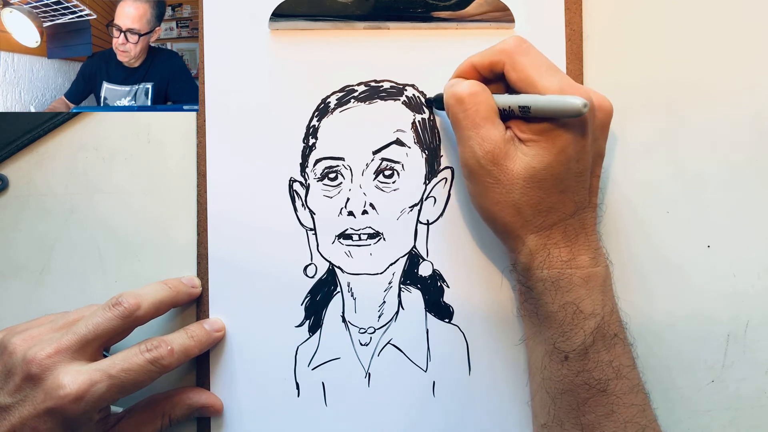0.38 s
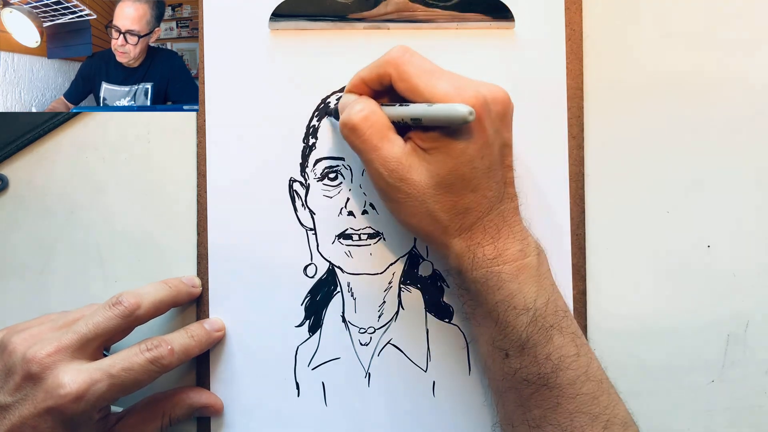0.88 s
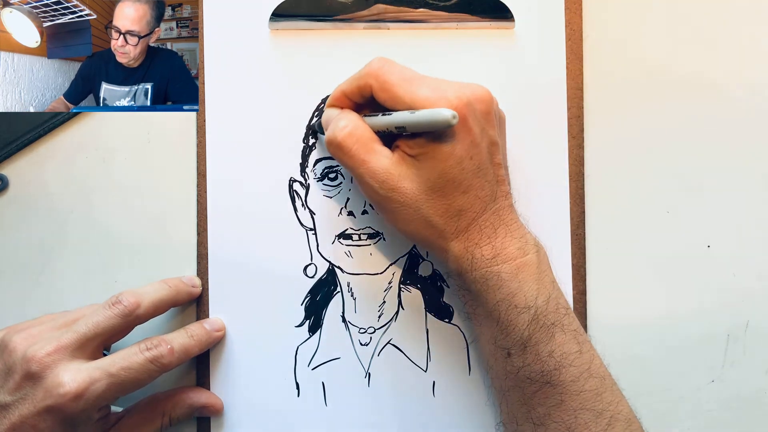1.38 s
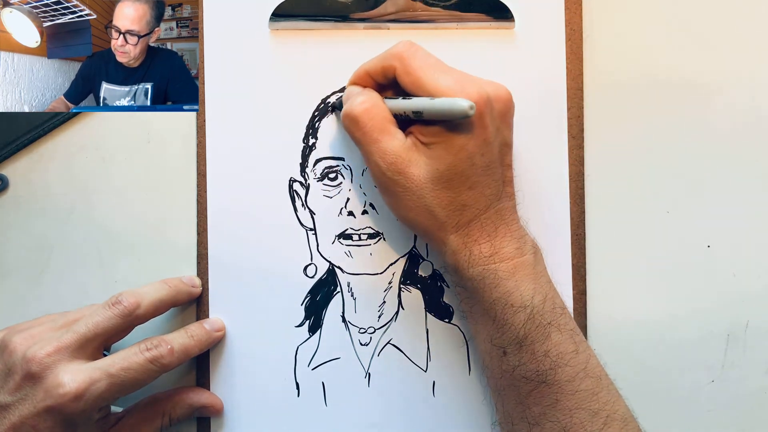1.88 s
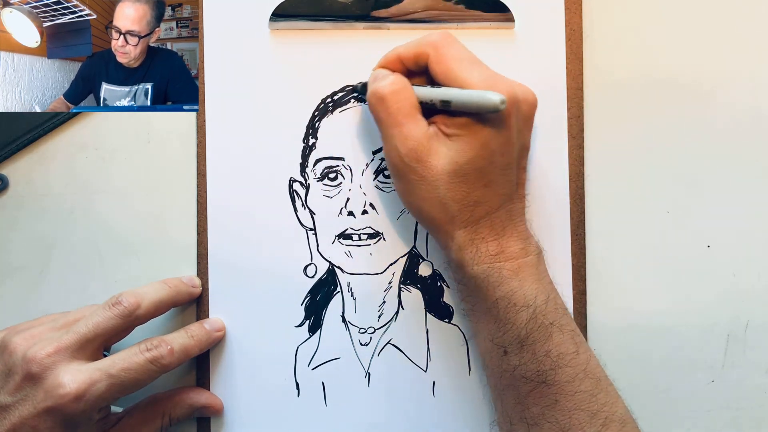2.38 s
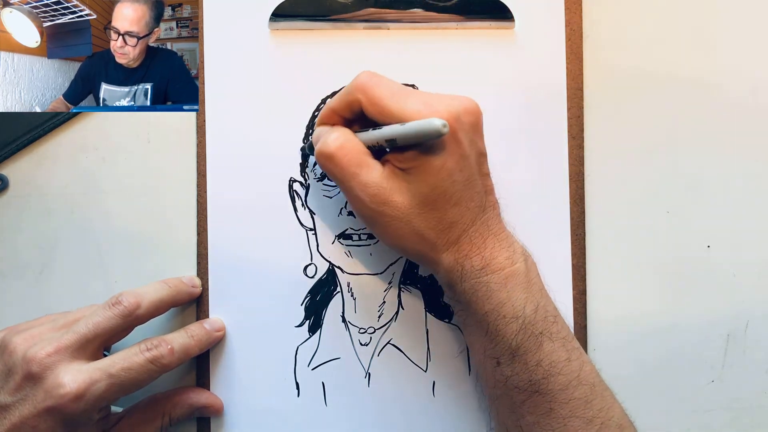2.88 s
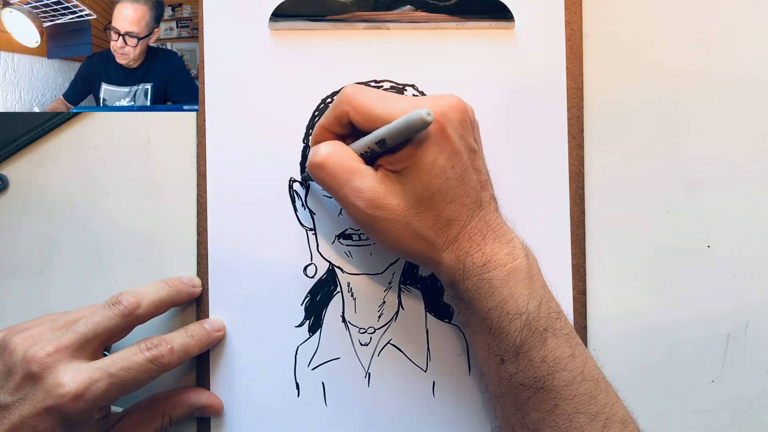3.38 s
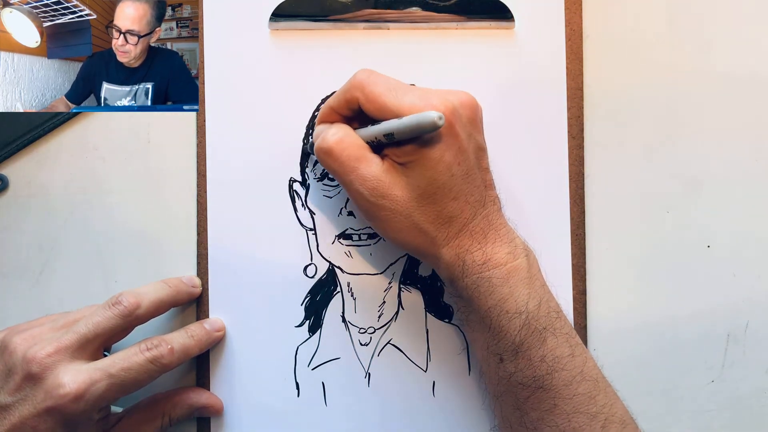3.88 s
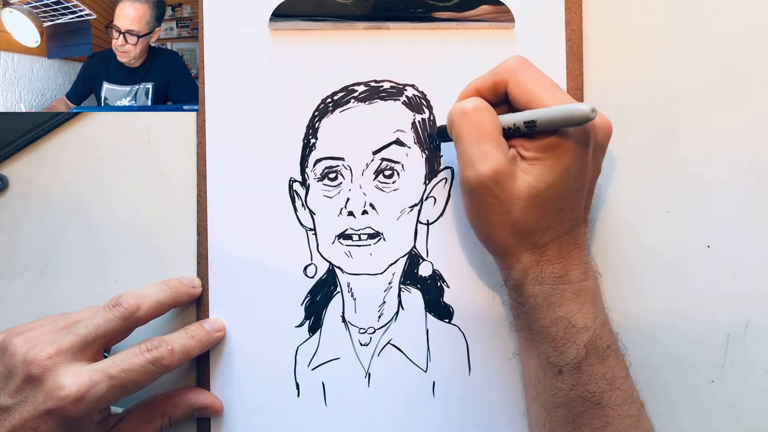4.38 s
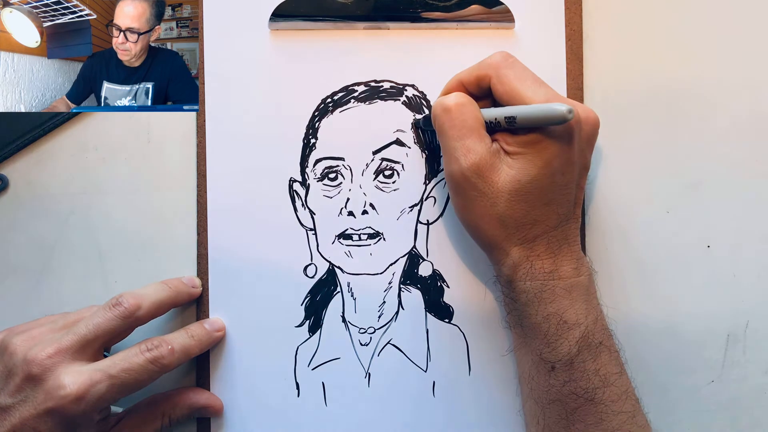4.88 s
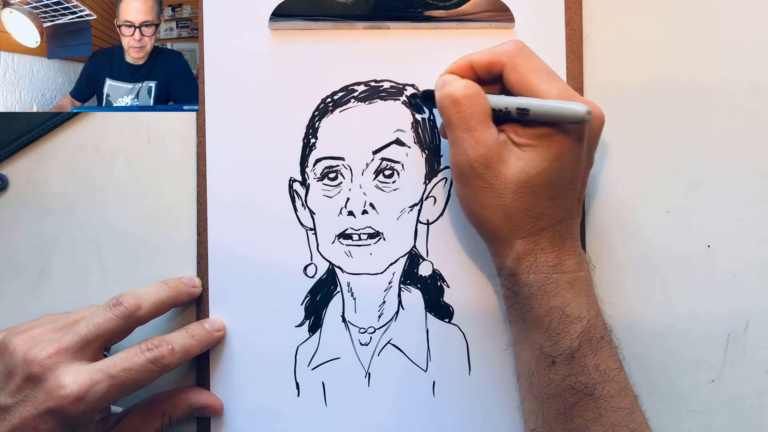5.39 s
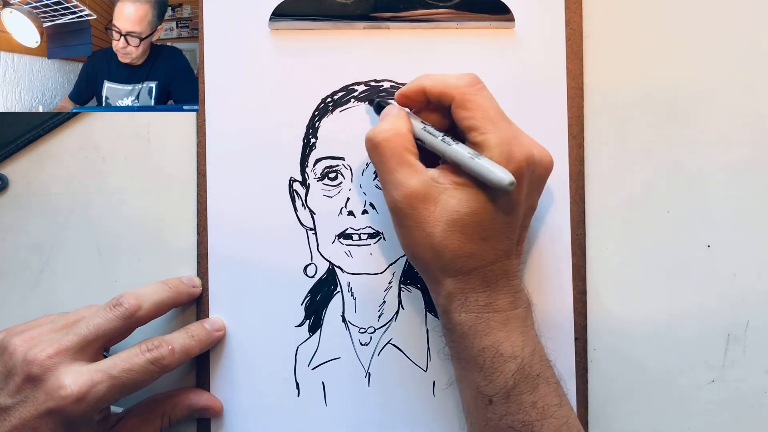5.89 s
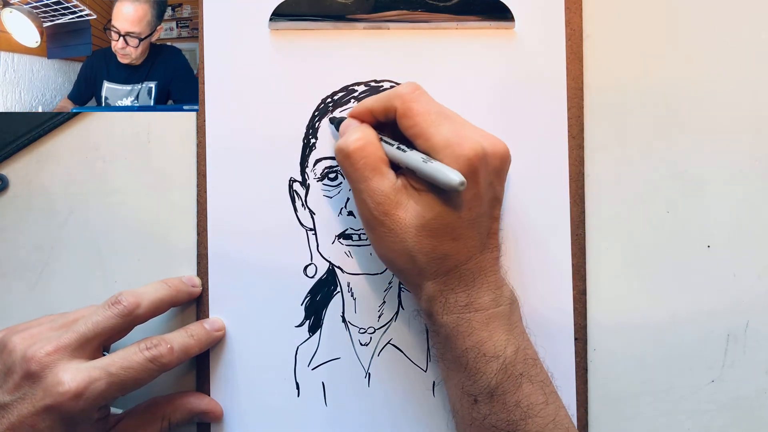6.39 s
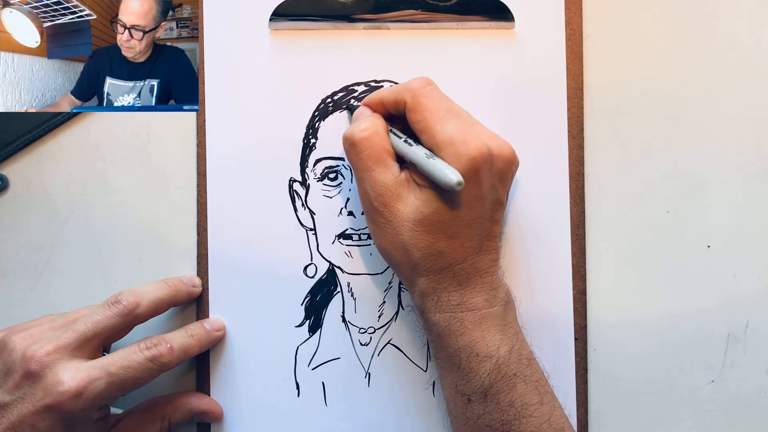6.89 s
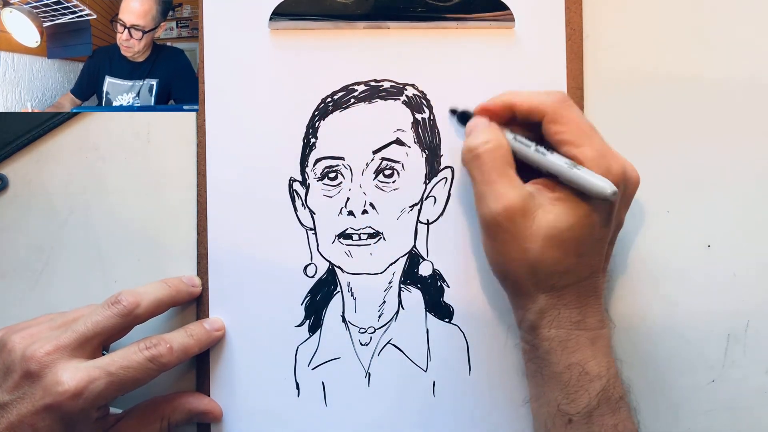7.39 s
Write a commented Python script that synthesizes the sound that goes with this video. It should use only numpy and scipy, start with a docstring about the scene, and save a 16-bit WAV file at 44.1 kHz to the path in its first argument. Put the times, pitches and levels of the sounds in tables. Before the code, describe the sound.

A small, quiet, dry room with dull traffic rumble outside. A marker hatches in fast bursts, thin and hissy with a woody rasp from the board beneath, broken by small taps. A deep engine throb pulses and grows, then sinks after five seconds. A palm thumps down, soft knocks follow in the pause, and a few brisk strokes and hand brushes finish. The microphone is close to the desk.

```python
"""A felt-tip marker hatches paper on a wooden board in a small quiet room, over traffic that swells and sinks:
shaped noise. From the start the tip catches on paper fibres, ringing pen barrel and board; the hand slides, and
there are ticks and squeaks (noise puffs) and knocks (fading tones of the board). After 1 s an engine comes in,
a rising tone with overtones and rough noise, its boom strongest around 4 to 5 s; late in that stretch the tip
judders. The pen pauses from about 5 s, with a palm thump and soft knocks; a few strokes follow, one at the end."""
import sys
import numpy as np
from scipy import signal
from scipy.fft import rfft, irfft, next_fast_len
from scipy.io import wavfile
from scipy.ndimage import uniform_filter1d

SR = 44100
rng = np.random.default_rng(int(sys.argv[2]) if len(sys.argv) > 2 else 0)


def linear_from_db(decibels):
    """Turn decibels (scalar or array-like) into linear amplitude factors; 0 gives 1."""
    return 10 ** (np.asarray(decibels, float) / 20)


def generate_wav(signal):
    """Clip the signal to [-1, 1] and save it as 16-bit WAV at the path in sys.argv[1]."""
    frames = np.transpose(np.atleast_2d(signal))
    scaled = np.clip(frames, -1, 1) * 32767
    pcm = np.round(scaled).astype(np.int16)
    wavfile.write(sys.argv[1], SR, pcm)


N = 330739


def rms_one(x):
    """Scale to rms 1."""
    return x / np.sqrt(np.mean(x ** 2) + 1e-20)


def in_time(rows):
    """Join each column after the first (time) by straight lines, one value a sample."""
    s, *columns = np.transpose(rows)
    return np.array([np.interp(np.arange(N) / SR, s, column) for column in columns])


def drift(rate_hz):
    """Slow random wandering of spread 1: noise sent twice through a one-pole low-pass."""
    r = np.exp(-80 * np.pi * rate_hz / SR)   # made at one value per 40 samples
    noise = rng.standard_normal(N // 40 + 2002)
    slow = signal.lfilter([1], [1, -2 * r, r * r], noise)[2000:]
    return np.interp(np.arange(N) / 40, np.arange(len(slow)), rms_one(slow))


def resonance(x, hz, width_hz):
    """Two-pole band-pass with gain 1 on top."""
    r = np.exp(-np.pi * width_hz / SR)
    feed = np.array([1, 0, -1]) * (1 - r * r) / 2
    return signal.lfilter(feed, [1, -2 * r * np.cos(2 * np.pi * hz / SR), r * r], x)


def coloured(spectrum, patchy_db):
    """Noise shaped by a spectrum, its level wandering; rms 1."""
    hz, db = np.transpose(spectrum)
    grid_hz = np.fft.rfftfreq(N, 1 / SR) + 1
    shape = linear_from_db(np.interp(np.log(grid_hz), np.log(hz), db, -80, -80))
    noise = irfft(rfft(rng.standard_normal(N)) * shape, N)
    return rms_one(noise * linear_from_db(patchy_db * drift(4.0)))


# traffic level over time: time_s, level_db, heavy_db (low end above that level)
TRAFFIC_LEVELS = [(0.0, -56, 7.5), (2.38, -60.5, 4), (2.86, -58.5, 6), (4.22, -58, 9.5), (4.68, -53, 3),
                  (5.12, -52.5, 8), (5.64, -55.5, -4), (6.2, -55.5, -0.5), (6.52, -48.5, 2.5),
                  (7.5, -51, -3.5)]
# noise colours, from deepest to highest: pitch_hz, relative_level_db (per Hz)
SUB_COLOUR = [(22, -28), (35, -1), (48, -12.5), (62, 5), (70, -14.5)]
LOW_COLOUR = [(36, -40), (62, 13.5), (150, 6), (200, -73), (330, -120)]
MID_COLOUR = [(88, -32), (150, 1.5), (216, -1), (393, -3), (547, -15), (600, -15.5), (780, -38),
              (1320, -120)]
AIR_COLOUR = [(350, -63), (600, -13), (726, -3.5), (855, 0.5), (1290, 2), (1580, -1.5), (2070, -2.5),
              (3380, -10), (10000, -24), (13200, -31), (15500, -37)]
SUB_DB, AIR_DB = -3.5, -58   # sub against the low end; air while traffic is at its mean dB
AIR_FOLLOWS, TREBLE_FOLLOWS = 0.69, -0.53   # dB per dB of traffic: the air swells and dulls


def rumble():
    """Traffic through the walls is deep noise; the air of the room is a fainter, higher one."""
    traffic_db, heavy_db = in_time(TRAFFIC_LEVELS)
    swing_db = traffic_db - traffic_db.mean()
    sub = linear_from_db(traffic_db + heavy_db + SUB_DB) * coloured(SUB_COLOUR, patchy_db=4.5)
    low = linear_from_db(traffic_db + heavy_db) * coloured(LOW_COLOUR, patchy_db=0.5)
    mid = linear_from_db(traffic_db) * coloured(MID_COLOUR, patchy_db=1.65)
    air = coloured(AIR_COLOUR, patchy_db=0.82)
    dull = signal.sosfiltfilt(signal.butter(2, 4000, fs=SR, output="sos"), air)
    treble = linear_from_db(TREBLE_FOLLOWS * swing_db) * (air - dull)
    return sub + low + mid + linear_from_db(AIR_DB + AIR_FOLLOWS * swing_db) * (dull + treble)


# engine over time, its boom swelling and sinking: time_s, firing_pitch_hz, boom_db (rms)
ENGINE_RUN = [(1.3, 43.6, -50), (1.75, 46.2, -45.5), (1.95, 47.2, -59), (2.47, 47.17, -72),
              (2.8, 49.23, -33.5), (3.01, 47.83, -47), (3.3, 52.2, -29.5), (3.51, 51.4, -46.5),
              (3.77, 52.4, -21), (4.01, 52.54, -30), (4.13, 54.8, -29.5), (4.23, 54, -21.5),
              (4.53, 53.87, -19), (4.93, 54.23, -18.5), (5.0, 55.37, -20.5), (5.11, 55.54, -32),
              (5.32, 56.36, -25), (5.6, 55.2, -50.5), (5.88, 55.9, -43.5), (6.1, 55.1, -41.5),
              (6.2, 57.52, -51), (6.39, 57.1, -44.5), (7.0, 59.96, -44.5), (7.17, 59.9, -58),
              (7.5, 58.2, -39)]
# overtones, rms with the boom at -30 dB: multiple, first_db, last_db, share (of the boom's swing)
ENGINE_OVERTONES = [(2, -47.5, -52.5, 0.49), (3, -60.5, -62, 0.24), (4, -84, -46.5, 0.36),
                    (5, -67.5, -66, 0.35), (6, -67, -88, .2), (7, -81, -73.5, 0.11)]
GRUFF_HZ, GRUFF_WIDTH_HZ = 149, 74.5   # exhaust noise; a second filter is twice as wide
GRUFF_GAIN_DB, GRUFF_FOLLOWS = -56, 0.53   # before the final sqrt(2), boom at -29.5 dB; dB per dB of boom
ROOM_MODE_HZ, ROOM_MODE_HALF_WIDTH_HZ, ROOM_MODE_DB = 166.8, 4.3, 8   # lifts overtones that pass through


def engine():
    """The firing tone booms; its overtones waver above it, with exhaust noise that swells with the boom."""
    hz, boom_db = uniform_filter1d(in_time(ENGINE_RUN), 1500, axis=1)
    phase = 2 * np.pi * np.cumsum(hz) / SR
    way = np.arange(N) / N   # 0 at the start, 1 at the end
    out = linear_from_db(boom_db) * np.sin(phase)
    for k, first_db, last_db, share in ENGINE_OVERTONES:
        level_db = first_db + way * (last_db - first_db) + 3.3 * drift(2.1) + share * (boom_db + 30)
        level_db += ROOM_MODE_DB / (1 + ((k * hz - ROOM_MODE_HZ) / ROOM_MODE_HALF_WIDTH_HZ) ** 2)
        out += linear_from_db(level_db) * np.sin(k * phase + 0.91 * drift(5.2))
    gruff = resonance(rng.standard_normal(N), GRUFF_HZ, GRUFF_WIDTH_HZ)
    gruff = resonance(gruff, GRUFF_HZ, 2 * GRUFF_WIDTH_HZ)
    gruff = rms_one(gruff * linear_from_db(3 * drift(6)))
    out += linear_from_db(GRUFF_GAIN_DB + GRUFF_FOLLOWS * (boom_db + 29.5)) * gruff
    fade_in = np.clip((way * N / SR - ENGINE_RUN[0][0] + 0.25) / 0.8, 0, 1)
    return np.sqrt(2) * out * fade_in   # a sine of peak sqrt(2) has rms 1


ROOM_T60_S, WALL_CUT_HZ, ROOM_DB = 0.16, 3300, -15.5   # fade of the lows by 60 dB; dulling; echo gain


def room(x):
    """Walls send sound round and round: eight feedback delays, duller on every round."""
    size = next_fast_len(N + SR // 2)
    z = np.exp(-2j * np.pi * np.arange(size // 2 + 1) / size)   # delay of one sample
    dull = np.exp(-2 * np.pi * WALL_CUT_HZ / SR)
    tail = 0
    for k, lag in enumerate((rng.uniform(.009, .03, 8) * SR).astype(int)):
        loop = linear_from_db(-60 * lag / SR / ROOM_T60_S) * (1 - dull) / (1 - dull * z) * z ** lag
        tail = tail + (-1) ** k * loop / (1 - loop)
    return irfft(rfft(x, size) * tail, size)[:N]


# ticks, squeaks and brushes, a low palm thump at 4.98 s, soft knocks near 5.8 s:
# start_s, peak_db, pitch_hz, t60_s (noise fades 60 dB), width_share (first filter's width / pitch)
NOISE_PUFFS = [(0.053, -32.5, 7100, 0.017, 0.057), (.324, -46, 3660, 0.014, 0.87),
               (.822, -52, 3630, 0.14, .05), (1.745, -47.5, 3860, .2, 0.031),
               (2.245, -42, 4230, 0.045, 0.056), (2.264, -52.5, 5820, 0.15, 0.067),
               (4.2, -51, 780, 0.15, 0.065), (4.233, -33.5, 3040, 0.0209, 0.17),
               (4.982, -24, 165.2, 0.19, 0.17), (5.771, -42, 442.5, 0.35, 0.22),
               (5.81, -42.5, 1000, 0.35, 0.29), (7.06, -51, 3791, .2, 0.052), (7.105, -49, 3416, .1, .08)]


def puffs():
    """Ticks, squeaks, brushes, the palm thump and soft knocks are short puffs of noise around one pitch."""
    out, t = np.zeros(N), np.arange(SR // 4) / SR
    for s, peak_db, hz, t60, share in NOISE_PUFFS:
        puff = rng.standard_normal(len(t)) * linear_from_db(-60 * t / t60) * np.minimum(t / t60 * 12, 1)
        puff = resonance(resonance(puff, hz, share * hz), hz, 2 * share * hz)
        out[round(s * SR):][:len(t)] += linear_from_db(peak_db) * puff / np.abs(puff).max()
    return out


# knocks on the board: start_s, level_db (rms of the first 30 ms), contact_cut_hz,
# thud_db (boost under 260 Hz), body_db (boost from there to 600 Hz)
KNOCKS = [(0.895, -49.5, 1610, 6, 5.5), (1.227, -37, 2500, 6.5, 7.5), (1.691, -30.5, 3500, -0.5, -0.5),
          (1.942, -35, 2760, 3, 1), (2.493, -34.5, 1900, -2, 2.5), (4.981, -30.5, 456, -2, -7),
          (7.22, -36.5, 547, -9.5, 1)]
# tones of the struck board: pitch_hz, relative_level_db, t60_s (time to fade 60 dB)
KNOCK_TONES = [(45, -11, 0.81), (92.2, -11.5, 0.24), (127.3, -2, 0.31), (162, -4.5, 0.072),
               (229, -3.5, 0.095), (295.5, -2.5, 0.043), (376, -0.5, 0.084), (478, -2.5, 0.051),
               (552, 3.5, 0.014), (654, 5.5, 0.016), (893, 8, 0.013), (1080, 2.5, 0.022), (1200, -1, 0.047),
               (1400, 3, 0.014), (1840, -14, 0.045), (1900, -14, 0.056), (2100, -5.5, 0.019),
               (2700, -3.5, 0.02), (3500, -8, 0.017), (4000, -15, 0.017)]


def knocks():
    """Each knock strikes all board tones through a soft or hard contact that chatters for a few ms."""
    out, t = np.zeros(N), np.arange(SR // 3) / SR
    chance = rng.normal(0, 1, (len(KNOCKS), len(KNOCK_TONES)))
    chatter = rng.normal(0, 1, (len(KNOCKS), 12))
    for (s, knock_db, cut_hz, thud_db, body_db), luck, bounces in zip(KNOCKS, chance, chatter):
        ring = 0
        for k, (hz, db, t60) in enumerate(KNOCK_TONES):
            boost_db = thud_db if hz < 260 else body_db * (hz < 600)
            level_db = db + 1.5 * luck[k] + boost_db - 60 * t / t60
            onset = 1 - np.exp(-t * hz * 2.0)
            ring = ring + (-1) ** k * linear_from_db(level_db) * onset * np.sin(2 * np.pi * hz * t)
        contact = np.zeros(600)
        contact[np.arange(12) * 47] = .5 * bounces * linear_from_db(-1.0 * np.arange(12))
        contact[0] = 1
        crisp = signal.sosfilt(signal.butter(2, 260, "high", fs=SR, output="sos"), ring)
        ring = ring - crisp + np.convolve(crisp, contact)[:len(t)]   # only the upper tones follow the chatter
        ring = signal.sosfilt(signal.butter(3, cut_hz, fs=SR, output="sos"), ring)
        ring *= 1 - np.exp(-t * cut_hz * 0.79)   # a soft contact builds up slowly
        at = round(s * SR)
        out[at:at + len(t)] += (linear_from_db(knock_db) * ring / ring[:1300].std())[:N - at]
    return out


# the tip grips and lets go: start_s (first slip), end_s, slips_per_s, depth_db
JUDDERS = [(4.54, 4.627, 39, 2.5), (4.718, 4.788, 52, 7.5)]


def judder():
    """Each slip starts loud and sinks until the next."""
    t, db = np.arange(N) / SR, np.zeros(N)
    for start, end, per_s, depth_db in JUDDERS:
        since_slip = (t - start) * per_s % 1   # 0 to 1
        db += depth_db * (.5 - since_slip) * (t > start) * (t < end)
    return linear_from_db(db)


RUN_UP_DB, SAG_DB_PER_S = 14.5, 77   # gain from landing to full speed; sag while held
LIFT_DB, LIFT_CURVE = 6, 0.82   # drop after one lift time; power of time in the lift
USUAL_STROKE_S, LIFT_FOLLOWS = 0.053, 0.37   # short strokes lift faster, as this power of their length


def stroke_db(t, peak, run_up, hold, lift_s):
    """A stroke speeds up from its landing, sags while held and lifts; 0 dB at full speed."""
    lift_s = lift_s * ((run_up + hold) / USUAL_STROKE_S) ** LIFT_FOLLOWS
    before = np.where(t > peak - run_up, -RUN_UP_DB * ((t - peak) / run_up) ** 2, -140)
    sag_db = SAG_DB_PER_S * np.minimum(t - peak, hold)
    fall_db = LIFT_DB * (np.maximum(t - peak - hold, 0) / lift_s) ** LIFT_CURVE
    return np.where(t < peak, before, -sag_db - fall_db)


# pen strokes: full_speed_s, run_up_s, hold_s, scratch_db, pressure_db (board against scratch)
STROKES = [(.008, 0.024, 0.0082, -49, 15), (0.52, 0.037, 0.019, -46.5, 9),
           (0.672, 0.042, 0.011, -65.5, 22.5), (0.7, 0.037, 0.0063, -45.5, -5),
           (0.899, 0.006, .002, -73.5, 30), (0.932, 0.015, 0.038, -47, -10.5),
           (1.019, 0.028, .005, -63.5, 21.5), (1.022, 0.0036, 0.0018, -67.5, 34),
           (1.275, 0.029, 0.011, -53.5, -1.5), (1.34, .014, 0.024, -47.5, 14),
           (1.404, 0.017, 0.015, -56, -2), (1.489, 0.034, 0.0032, -45.5, 9.5), (1.535, .015, .004, -57, -2),
           (1.723, 0.013, 0.017, -44.5, -7), (1.963, 0.011, 0.038, -41.5, -13),
           (2.533, 0.015, 0.0055, -72.5, 36.5), (2.559, 0.022, 0.044, -41.5, 0.5),
           (2.697, 0.018, 0.0096, -73, 24), (2.75, 0.017, 0.08, -65.5, 10), (2.903, 0.062, 0.044, -51.5, 7),
           (3.07, 0.062, 0.034, -45, -14.5), (3.178, 0.12, 0.036, -46.5, -10.5),
           (3.22, 0.023, 0.022, -69.5, 15), (3.359, 0.017, 0.013, -44.5, -9),
           (3.444, 0.028, .005, -41, -14.5), (3.517, 0.016, 0.01, -45.5, 9), (3.561, .03, 0.022, -66, 21.5),
           (4.152, 0.014, 0.041, -43, -13), (4.281, 0.017, 0.0086, -49, -3),
           (4.424, 0.036, 0.011, -54, 3.5), (4.46, 0.039, 0.0046, -64.5, 20.5),
           (4.502, 0.036, 0.0038, -52.5, 15), (4.556, 0.0074, 0.028, -58.5, 23),
           (4.643, 0.011, 0.0018, -63, 28), (4.667, 0.0029, 0.0043, -58, 20.5),
           (4.694, 0.0092, 0.022, -61, 22), (4.737, .04, 0.026, -70, 35),
           (4.792, .004, 0.0044, -73.5, 36.5), (4.819, .03, 0.014, -83, 28),
           (6.235, 0.053, 0.069, -43.5, -15.5), (6.398, .01, .01, -47, -23),
           (6.434, .04, 0.029, -42.5, -5.5), (7.275, 0.019, 0.026, -37.5, -14.5)]
# the hand slides over the paper: start_s, length_s, level_db, board_db (against slide), top_db (against hiss)
HAND_SLIDES = [(0.026, 0.3, -55.5, -12, 4.5), (1.741, .1, -67, -13, -2), (2.16, 0.19, -63, -21, 2),
               (3.621, 0.23, -55, -18, 6.5), (5.043, .14, -62.5, -8, 3.5), (6.52, 0.27, -54, -12, 6),
               (6.735, 0.23, -65.5, 1, 0), (7.381, 0.26, -52.5, -19, 6)]
TIP_LIFT_S, BOARD_LIFT_S = 0.0072, 0.011   # for a stroke of usual length
BOARD_DELAY_S = 0.00052   # the board answers almost at once
BARREL_DB, BARREL_FOLLOWS = -0.16, 0.46   # barrel against scratch, plus this share of the pressure
BARREL_LEANS = 0.18   # barrel dB lost per dB of lean
SLIDE_POINTED, SLIDE_BARREL_DB = 0.99, -5   # power of the half-sine swell; barrel against slide


def force(lean_db):
    """The strongest stroke or slide sets the gains of hiss, top, barrel and board; also says when it slides."""
    t = np.arange(0, N, 8) / SR   # every eighth sample
    lean = lean_db[::8]
    db, sliding = np.full((4, len(t)), -140.), np.zeros(len(t))
    for peak, run_up, hold, scratch_db, press_db in STROKES:
        tip = scratch_db + stroke_db(t, peak, run_up, hold, TIP_LIFT_S)
        barrel = tip + BARREL_DB + BARREL_FOLLOWS * press_db - BARREL_LEANS * lean
        board = scratch_db + press_db + stroke_db(t - BOARD_DELAY_S, peak, run_up, hold, BOARD_LIFT_S)
        db = np.maximum(db, [tip - lean, tip, barrel, board])
    for start, length, slide_db, board_db, top_db in HAND_SLIDES:
        on = (t > start) & (t < start + length)
        arch = on * np.abs(np.sin(np.pi * (t - start) / length))
        swell = slide_db + 20 * SLIDE_POINTED * np.log10(arch + 1e-6)
        db = np.maximum(db, [swell - top_db, swell, swell + SLIDE_BARREL_DB, swell + board_db])
        sliding = np.maximum(sliding, on)
    smooth = uniform_filter1d(np.vstack([linear_from_db(db), sliding]), size=8, axis=1)
    full = np.array([np.interp(np.arange(N) / SR, t, g) for g in smooth])
    return full[:4], full[4]


def near(focus_hz, slope_db, most_db):
    """Modes near a focus ring most: dB lost per octave away, up to a limit."""
    return lambda hz: -np.minimum(slope_db * np.abs(np.log2(hz / focus_hz)), most_db)


def rubbed(modes, fibres, grip, grip_db, weight_db=lambda hz: 0):
    """Fibre catches ring each mode, which swells and fades on its own; a loose grip smears them to a wash."""
    out = 0
    for k, (hz, width, db) in enumerate(modes):
        broad = resonance(fibres, hz, 4 * width)
        sharp = (-1) ** k * resonance(broad, hz, width)
        rung = grip * sharp + 0.39 * (1 - grip) * broad
        out = out + linear_from_db(db + weight_db(hz) + grip * grip_db * drift(10.8)) * rung
    return out / np.sqrt(uniform_filter1d(out ** 2, 1300) + 1e-12)   # even level, so the stroke sets it


# resonances under the dragging tip (hiss, top), of the pen barrel and of the board:
# pitch_hz, width_hz (of the sharp filter), relative_level_db
HISS_MODES = [(4930, 720, 3.5), (5690, 190, 10.5), (6050, 56, 0.5), (6014, 150, 10.5), (6545, 780, 13.5),
              (6900, 29, -9), (7560, 440, 9.5), (8340, 90, 12)]
TOP_MODES = [(8790, 135, 4), (8900, 73, -28.5), (9364, 210, 8), (10170, 270, 7), (10200, 850, -8.5),
             (10870, 520, 1.5), (11680, 126, 3), (12320, 94, -30.5), (12280, 190, 5), (13620, 220, -9),
             (14030, 300, -7.5), (15500, 170, -11), (15000, 330, -22), (14670, 140, 5.5)]
BARREL_MODES = [(1989, 20, 12.5), (2370, 185, 9), (2710, 97, 8.4), (3067, 80, 7.4), (3328, 88, 8),
                (3700, 140, 8.4), (4056, 125, 3.4), (4340, 150, 1.5)]
BOARD_MODES = [(1000, 150, -10), (1120, 78, 3.5), (1274, 168, -3), (1379, 109, 6.5), (1541, 50, -7.5),
               (1678, 40, 4), (1750, 340, -15)]
# how the pen leans: time_s, lean_db (top against hiss), top_slope_db (per octave while the pen draws),
# board_focus_hz, barrel_focus_hz
PEN_LEAN = [(.03, 0, 22, 1680, 2550), (.52, 1.5, -2, 1380, 2900), (.7, 4, 0, 1390, 3020),
            (.94, 9, -5, 1370, 3430), (1.03, 0, -3, 1240, 2680), (1.35, 4.5, 7, 1190, 2940),
            (1.49, -0.5, -10, 1330, 2900), (1.73, 3, 12, 1200, 3250), (1.98, 3, 7, 1200, 3220),
            (2.57, 1, 2, 1370, 3020), (2.7, 3, 2, 1400, 2900), (2.76, -6, 2, 1310, 2610),
            (2.9, 7.5, -34, 1289, 2370), (3.04, 7.5, -12, 1350, 1960), (3.15, 2, 6, 1343, 4260),
            (3.36, 1, 11, 1350, 2680), (3.44, 3, 6, 1380, 3308), (3.52, -2.5, -2, 1320, 2860),
            (3.58, 4, -5, 1110, 2730), (4.17, 14, -10, 1416, 2840), (4.28, 4, -21, 1330, 3100),
            (4.41, 4, -27, 1246, 3700), (4.49, 6, -23, 1301, 2309), (4.58, 2, -9, 1180, 3700),
            (4.7, 1.5, -7, 1400, 3480), (4.77, -7, -6, 1617, 2260), (6.2, 7, -2, 1264, 4000),
            (6.29, 8, 6, 1306, 3570), (6.44, 0, 8, 1331, 3120), (7.29, 2.5, -7, 1540, 2849)]
PEN_GRIP, HAND_GRIP = 0.94, 0.089   # 0-1, how sharply the modes ring
SLIDE_SLOPE_DB = 30   # slope of the top per octave while the hand slides


def marker():
    """Dense uneven catches of felt on fibres, in lumps, ring tip, barrel and board by the force of each stroke."""
    lean_db, pen_slope_db, board_hz, barrel_hz = in_time(PEN_LEAN)
    gains, sliding = force(lean_db)
    grip = np.clip(PEN_GRIP + (HAND_GRIP - PEN_GRIP) * sliding, 0, 1)
    slope_db = (1 - sliding) * pen_slope_db + sliding * SLIDE_SLOPE_DB
    sizes = linear_from_db(1.74 * np.minimum(rng.exponential(1, N), 5)) * rng.choice([-1, 1], N)
    caught = rng.random(N) < 9000 / SR   # about 9000 catches a second
    fibres = sizes * caught * linear_from_db(0.46 * grip * drift(48))
    tilt = lambda hz: slope_db * np.log2(hz / 1e4)
    near_barrel = near(barrel_hz, slope_db=52 * grip, most_db=13.5)
    near_board = near(board_hz, slope_db=34, most_db=29)
    hiss = rubbed(HISS_MODES, fibres, grip, grip_db=10.0)
    top = rubbed(TOP_MODES, fibres, grip, grip_db=4.0, weight_db=tilt)
    barrel = rubbed(BARREL_MODES, fibres, grip, grip_db=4.0, weight_db=near_barrel)
    board = rubbed(BOARD_MODES, fibres, grip, grip_db=7.0, weight_db=near_board)
    return judder() * np.sum(gains * [hiss, top, barrel, board], axis=0)


def scene():
    """Desk sounds with their room, over the sounds from outside."""
    desk = marker() + knocks() + puffs()
    return (desk + linear_from_db(ROOM_DB) * room(desk) + engine() + rumble())[None]


def top_cut(x):
    """Nothing passes above the cut-off."""
    return signal.sosfilt(signal.butter(12, 16820, fs=SR, output="sos"), x)


def record(dry):
    """A steep low-pass takes off the highest treble of the finished mix."""
    low_pass = signal.cheby2(10, 60, 16150, fs=SR, output="sos")   # 60 dB down from 16150 Hz
    mix = signal.sosfilt(low_pass, dry)
    return top_cut(mix)


dry = scene()
out = record(dry)
generate_wav(out)
```